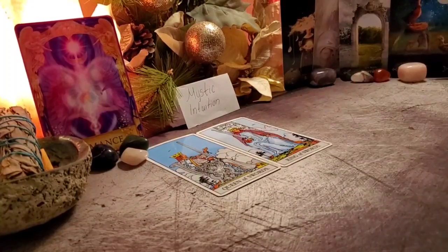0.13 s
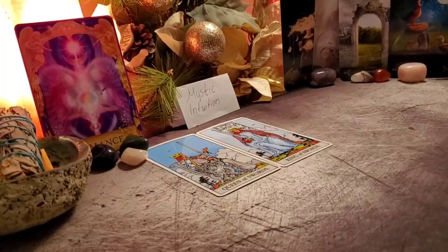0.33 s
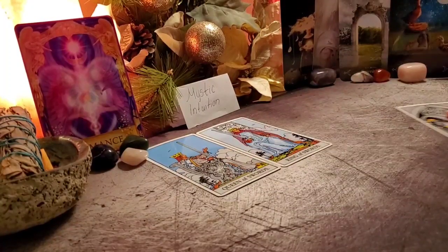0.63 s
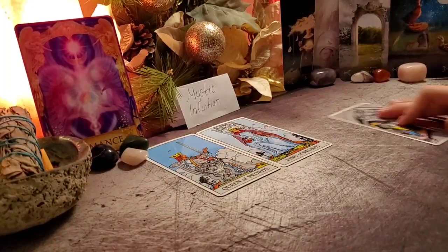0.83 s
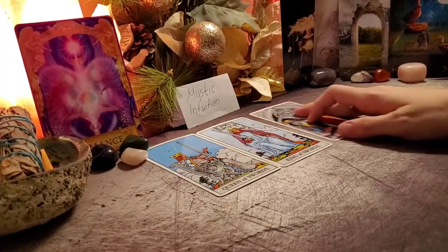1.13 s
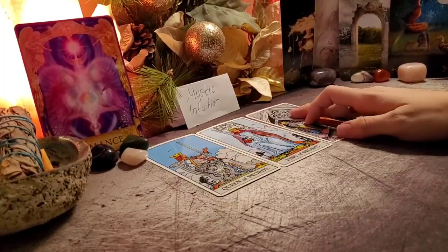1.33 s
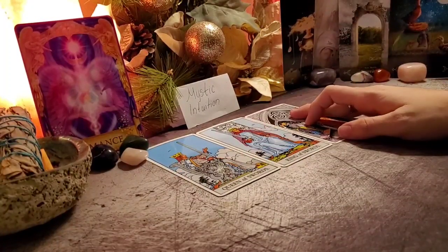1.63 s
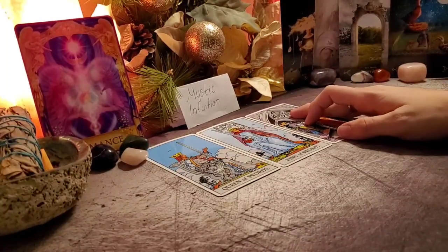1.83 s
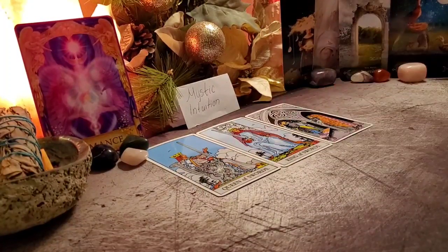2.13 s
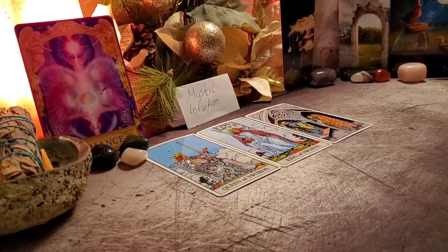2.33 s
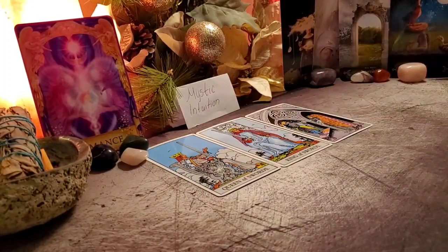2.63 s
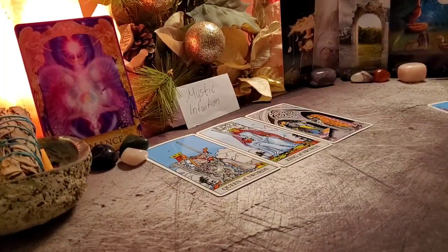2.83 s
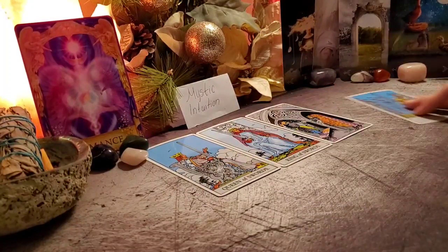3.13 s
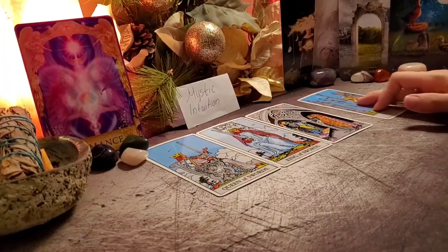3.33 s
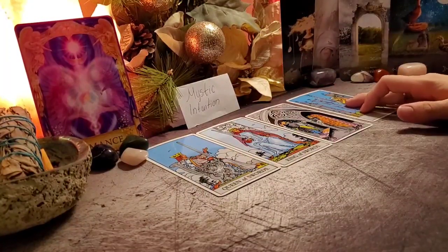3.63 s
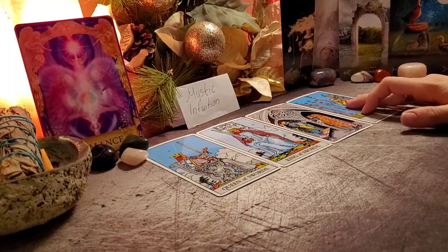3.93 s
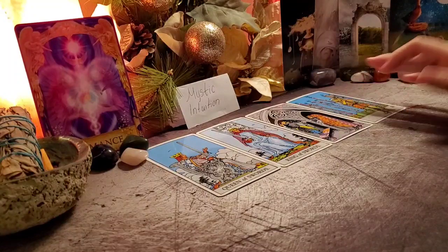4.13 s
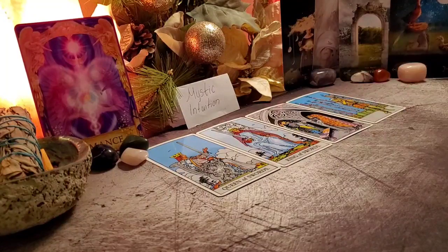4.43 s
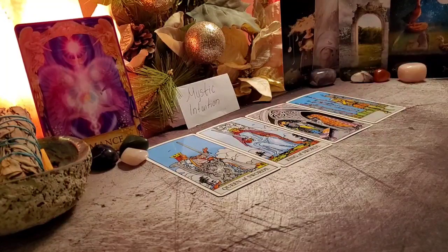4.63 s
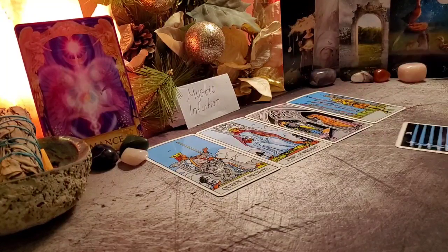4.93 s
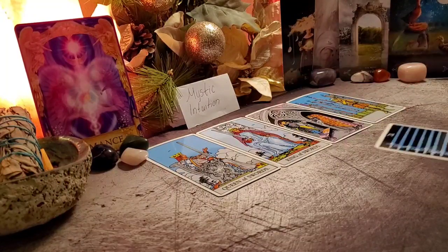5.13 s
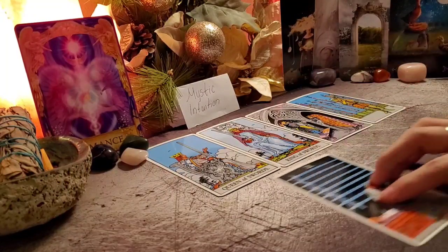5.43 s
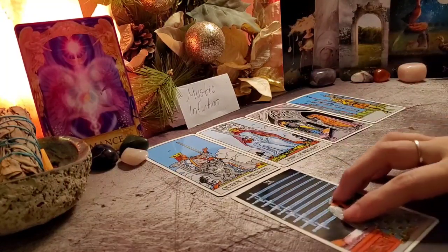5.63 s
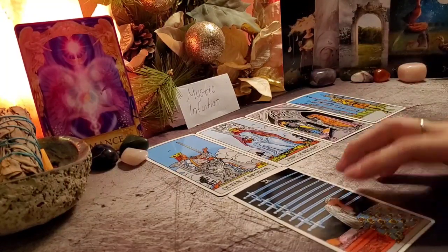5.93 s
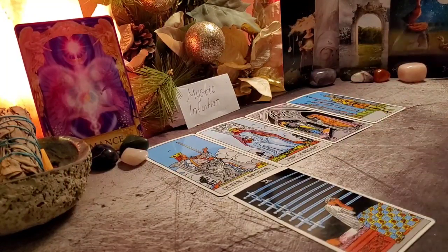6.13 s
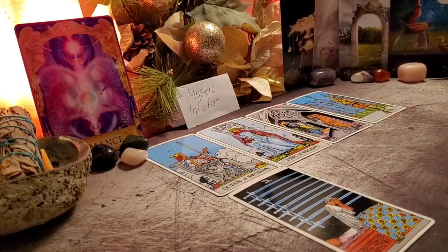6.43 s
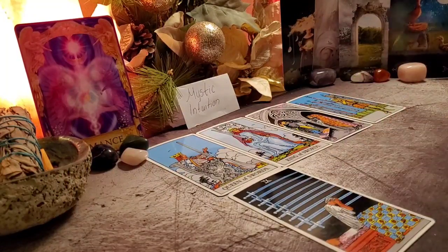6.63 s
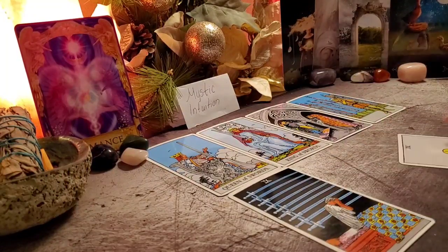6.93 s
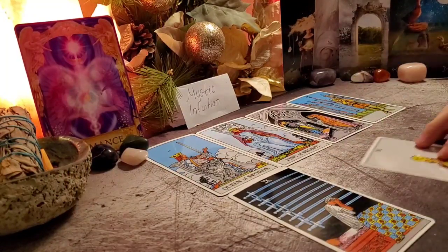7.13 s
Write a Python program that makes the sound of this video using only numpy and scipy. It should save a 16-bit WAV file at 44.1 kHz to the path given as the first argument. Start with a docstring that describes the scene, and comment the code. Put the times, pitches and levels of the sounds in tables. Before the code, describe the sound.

Over a constant low appliance hum in a small room, a card rasps and snaps loudly off a deck on the right, taps the table and brushes quietly into place. This happens four times, about two seconds apart, the last snap duller and followed by a firm knock on the table. Close stereo pickup, short reflections, slight hiss.

```python
"""Stiff cards drawn off a deck

Cards leave a deck held at the right: bright noise scrapes, then ringing cracks with low thuds snap them free.
Struck modes tap each card down on a hard table at times, and wide gritty noise slides it into place.
Sparse reflections make a small room; an appliance hums as a sine with resonant noise and air.
The whole background dips after the first snap and recovers by about 1.75 s.
A spaced pair of microphone ports hears it all, with delay and shading between left and right."""
import sys
import numpy as np
from scipy import signal
from scipy.fft import rfft, irfft
from scipy.io import wavfile
from scipy.ndimage import uniform_filter1d

SR = 44100
rng = np.random.default_rng(int(sys.argv[2]) if len(sys.argv) > 2 else 0)


def inscribe(sig):
    """Save sig as 16-bit PCM at rate SR to the path in sys.argv[1].

    A 1-D sig is mono; a 2-D sig holds one channel per row.
    Samples are clipped to [-1, 1] before scaling.
    """
    pcm = np.round(np.clip(np.atleast_2d(sig).T, -1, 1) * 32767)
    wavfile.write(sys.argv[1], SR, pcm.astype(np.int16))


def volts_from_decibels(level):
    """Turn decibel levels (scalar or array-like) into linear amplitude factors."""
    exponent = np.asarray(level, float) / 20
    return 10 ** exponent


N = 321489

# modes of deck and hand: (f/Hz, level/dB, t60/s)
DECK_MODES = [(219, -10, .04), (276, -7.5, 0.067), (378, -10.5, 0.033), (636, -13.5, 0.013),
              (865, -2.5, 0.041), (1006, -1.5, 0.03), (1270, 0.5, 0.046), (1331, 0.5, 0.02),
              (1410, 0.5, 0.024), (1750, -0.5, 0.018), (2028, 2.5, .03)]
# left port turned away from the deck: (f/Hz, left minus right/dB)
DECK_SHADE = [(60, -10.5), (180, -2), (550, -3), (1650, -5), (4970, -2.5), (15000, -7)]
TABLE_SHADE = [(300, 1.5), (8000, 3.4)]  # (f/Hz, left minus right/dB)
DECK_LAG, TABLE_LAG = 16, 9  # samples by which left lags right


def evened(x):
    """Scales to rms 1."""
    return x / np.sqrt(np.mean(x ** 2) + 1e-20)


def peaked(x):
    """Scales to peak 1."""
    return x / (abs(x).max() + 1e-12)


def read(points, hz):
    """Reads a spectrum on a log-frequency axis."""
    f, value = np.transpose(points)
    return np.interp(np.log(hz + 1), np.log(f + 1), value)


def add(mix, s, sound):
    """Mixes a sound in at s seconds."""
    part = mix[:, round(s * SR):][:, :sound.shape[-1]]
    part += sound[..., :part.shape[1]]


def coloured(x, points):
    """Shapes x by a dB spectrum, rms 1."""
    size = x.shape[-1]
    gain = volts_from_decibels(read(points, np.fft.rfftfreq(size, 1 / SR)))
    return evened(irfft(rfft(x) * gain, size))


def band(x, low_hz, high_hz):
    """Causal band-pass."""
    return signal.sosfilt(signal.butter(2, [low_hz, high_hz], "bandpass", fs=SR, output="sos"), x)


def alike(size, share):
    """Two noises with a common part: a broad source sounds different at each port, except in the bass."""
    common, left, right = rng.standard_normal((3, size))
    share = np.clip(share, 0, 1)
    apart = np.array([left, right]) - common
    return common + (1 - share) * (apart - band(apart, 53, 1400))


def struck(modes, t, centre_hz):
    """Dying sines; a blow favours the modes near its centre, and no two blows land quite alike."""
    hz, db, t60 = np.transpose(modes)[:, :, None]
    spot = rng.standard_normal((len(modes), 2))
    detune = 1 + 0.033 * spot[:, :1]
    luck_db = 3 * spot[:, 1:]
    near_db = -4.0 * np.log2(hz / centre_hz) ** 2
    fall_db = -60 * t / t60
    ring = np.sin(2 * np.pi * hz * detune * t) * volts_from_decibels(db + near_db + luck_db + fall_db)
    return peaked(ring.sum(0))


def grit(per_s, spread_db, smooth_share):
    """Friction: random specks of uneven size over smooth noise, two separate streams."""
    size_db = spread_db * np.minimum(rng.exponential(1, (2, N)), 4)
    specks = (rng.random((2, N)) < per_s / SR) * volts_from_decibels(size_db)
    return evened(specks * rng.standard_normal((2, N))) + smooth_share * rng.standard_normal((2, N))


def strokes(rows, ends_db, square):
    """Each stroke swells to its strongest moment and fades; returns the gains of its two layers."""
    t, power = np.arange(N) / SR, np.zeros((2, N))
    for top, swell, fade, db, second_db in rows:
        away = np.where(t < top, (top - t) / swell, (t - top) / fade)
        # down by ends_db one swell or fade time away; a higher power flattens the top
        shape_db = ends_db * np.minimum(away, 2) ** square
        power += volts_from_decibels(db + np.array([[0], [second_db]]) + shape_db) ** 2
    return np.sqrt(power)


def ports(x, lag, balance):
    """A source nearer the right port reaches the left one later; balance tilts the pair by frequency."""
    tilt_db = read(balance, np.fft.rfftfreq(N, 1 / SR)) * np.array([[.5], [-.5]])
    return irfft(rfft([np.roll(x[0], lag), x[1]]) * volts_from_decibels(tilt_db), N)


def appliance():
    """A mains hum line, resonant drone and room air, all following one background level over time."""
    # background level over time, as that of the hum: (t/s, level/dB)
    background = [(0, -42), (.3, -42.5), (.6, -45.5), (1.0, -44.5), (1.5, -45.5), (1.75, -42.5), (2.1, -42),
                  (4.1, -42.5), (4.3, -42.5), (4.5, -43), (5.5, -43.5), (6.4, -42.5), (7.29, -42.5)]
    # spectrum of the room air, relative: (f/Hz, level/dB)
    air_curve = [(15, -56), (25, -19), (64, -28), (91, -12.5), (126, -17), (148, -14), (169, -15),
                 (421, -18.5), (523, -29), (598, -19), (741, -25), (2170, -32), (4400, -51.5), (7910, -77),
                 (13500, -60.5), (15500, -89.5)]
    # noise resonances of the drone: (f/Hz, width/Hz, level/dB)
    drone_bands = [(56, 20, -55), (120, 9.7, -65.5), (205.5, 12, -58.5), (290, 42, -60), (357, 38, -60.5),
                   (427.3, 110, -56), (603.3, 100, -56), (1355, 330, -68)]
    # left-right likeness of the noise: (f/Hz, correlation from -1 to 1)
    likeness = [(60, 0.51), (130, 1), (290, 0.89), (640, 0.25), (1410, -0.39), (3100, -0.049), (6820, 0.36),
                (15000, 0.027)]
    hum_hz, air_db = 120, -54.5
    s, hum_db = np.transpose(background)
    t, hz = np.arange(N) / SR, np.fft.rfftfreq(N, 1 / SR)

    a, b = rfft(rng.standard_normal((2, N)))
    same = np.clip(read(likeness, hz), -1, 1)
    pair = np.array([a, same * a + np.sqrt(1 - same ** 2) * b])
    air = volts_from_decibels(read(air_curve, hz))
    air *= volts_from_decibels(air_db) / np.sqrt(np.mean(air ** 2))
    drone = np.zeros(len(hz))  # power over frequency
    for f, width, db in drone_bands:
        resonance = 1 / (1 + (2 * (hz - f) / width) ** 2) ** 2
        drone += volts_from_decibels(db) ** 2 * SR / (np.pi * width) * resonance
    noise = irfft(pair * np.sqrt(air ** 2 + drone), N)

    level_db = np.interp(t, s, hum_db)
    phase = 2 * np.pi * hum_hz * t + np.array([[0], [.25]])  # right port leads by 0.25 rad
    hum = np.sqrt(2) * volts_from_decibels(level_db) * np.sin(phase) * volts_from_decibels([[1.1], [-1.1]])
    return hum + noise * volts_from_decibels(level_db - level_db.mean())


def room(x, start_s):
    """Sparse reflections of random sign, each band dying at its own speed, others for each port."""
    # decay off the near walls: (f/Hz, t60/s)
    decay = [(150, 0.3), (500, 0.16), (1500, 0.15), (3500, 0.13), (6000, 0.15), (9000, 0.13),
             (15000, 0.071)]
    late_db, late_stretch = -19, 3.2  # a fainter, slower tail from the rest of the room
    reflections, first = np.zeros((2, SR // 2)), round(start_s * SR)
    slots = np.arange(first, SR // 2 - 12, 12)  # one reflection in every 12 samples
    at = slots + rng.integers(0, 12, (2, len(slots)))
    np.put_along_axis(reflections, at, rng.choice([-1., 1.], at.shape), 1)
    hz, t, z = signal.stft(reflections, SR, nperseg=256)
    fall_db = -60 * t / read(decay, hz)[:, None]
    fall = volts_from_decibels(fall_db) + volts_from_decibels(late_db + fall_db / late_stretch)
    tail = signal.istft(z * fall, SR, nperseg=256)[1]
    low = band(tail[0], 60, 470)
    tail[1] += low - band(tail[1], 54, 390)  # long waves reach both ports alike
    return signal.fftconvolve(x, tail / np.linalg.norm(tail[0]), axes=1)[:, :N]


def slides():
    """Card dragged over the rough table: wide hiss with lower grit; the contact is broad, so the ports differ."""
    # strokes of card and hand: (strongest t/s, swell/s, fade/s, hiss level/dB, low grit re hiss/dB)
    slide_rows = [(.6, .04, .11, -70, -4), (.84, .18, 0.42, -63.5, -5), (1.07, .22, 0.24, -63.5, 1.5),
                  (1.48, .05, 0.078, -83, 4), (1.985, .035, .05, -77.5, 6), (2.15, .16, 0.2, -71.5, -8),
                  (2.39, .07, 0.11, -76, -12), (2.9, .03, 0.076, -73, 6), (3.04, .07, .22, -60.5, -16),
                  (3.27, .24, 0.33, -59, 2), (3.84, .06, 0.12, -80.5, 6), (4.26, .13, 0.21, -73.5, 5),
                  (4.45, .1, 0.11, -89, 8), (5.2, .2, 0.31, -66, -3), (5.5, .32, 0.32, -64, -2.5),
                  (6.23, .2, 0.12, -72, -6), (6.88, .03, 0.16, -68.5, 8.5), (7.06, .09, 0.17, -70, 1),
                  (7.27, .18, 0.11, -69, -5)]
    # spectrum of the rubbing hiss: (f/Hz, level/dB)
    rub_curve = [(2060, -35), (3500, -2.5), (6360, -1), (7810, -7.5), (8690, -4.5), (13900, -6),
                 (14900, -10), (15200, -52), (15500, -48)]
    pan_db = 3  # left minus right
    left, right = coloured(grit(per_s=2700, spread_db=-7.0, smooth_share=1.8), rub_curve)
    low = evened(band(grit(per_s=8400, spread_db=7.0, smooth_share=0.96), 900, 2500))
    fine, coarse = strokes(slide_rows, ends_db=-22, square=2.22)
    hiss_left = left + 0.13 * np.roll(right, TABLE_LAG)
    hiss_right = right + 0.043 * np.roll(left, -TABLE_LAG)
    hiss = np.array([hiss_left, hiss_right])
    return volts_from_decibels(np.array([[pan_db], [-pan_db]]) / 2) * (fine * hiss + coarse * low)


def chatters():
    """Something small on the table bounces after a tap: evenly spaced, fading ticks of a short sine."""
    # taps that set off a chatter: (t/s, level/dB)
    chatter_rows = [(0.5543, -27.5), (2.8638, -31), (4.999, -36.5), (6.8476, -38)]
    gap_s, chatter_hz = .0095, 3050
    out, t = np.zeros((2, N)), np.arange(4096) / SR
    since = t % gap_s  # time since the latest bounce
    bounces = peaked(since * np.exp(-since / 0.00085)) * np.exp(-t / 0.0056) * (t > gap_s)
    for s, db in chatter_rows:
        tone = np.sin(2 * np.pi * chatter_hz * since * rng.uniform(0.98, 1.03))
        add(out, s, volts_from_decibels(db) * peaked(bounces * tone))
    return ports(out, TABLE_LAG, TABLE_SHADE)


def taps():
    """Card and fingers touch the table: a quick push, the table's modes, an edge tick and a brief rattle."""
    # touches: (t/s, blow level/dB, edge tick re blow/dB, rattle re blow/dB)
    tap_rows = [(0.5381, -31, -12, -30), (0.5397, -41.5, 5, -2), (0.5551, -29.5, 5, -16.5),
                (1.319, -57.5, -21.5, -24), (1.5015, -52.5, -21.5, -26), (2.128, -56.5, -17, -20),
                (2.8638, -29, -7, -16), (2.989, -50, 3, -13), (4.9848, -48.5, -13, -12),
                (4.9998, -37, 6, -17), (6.8478, -16.5, -24, -30), (6.8494, -22.5, -24, -35),
                (6.8554, -40, -24, -52), (6.8971, -33.5, -30, -29), (6.909, -39.5, -3, -17.5)]
    # modes of the table top: (f/Hz, level/dB, t60/s)
    table_modes = [(199, -7, 0.054), (440, -26, 0.033), (830, 5, 0.025), (1247, 2, 0.017),
                   (1470, 3.5, 0.022), (2100, 5, 0.025)]
    out, t = np.zeros((2, N)), np.arange(4096) / SR
    push = peaked(t * np.exp(-t / 0.00027))
    for s, db, edge_db, rattle_db in tap_rows:
        edge = peaked(band(alike(len(t), share=0.55) * t * np.exp(-t / 0.00052), 2860, 5760))
        rattle = evened(band(alike(len(t), share=0.18), 550, 4300)) * np.exp(-t / 0.019)
        blow = 1.4 * struck(table_modes, t, centre_hz=1090) + 0.46 * push
        add(out, s, volts_from_decibels(db) * (blow + volts_from_decibels(edge_db) * edge + volts_from_decibels(rattle_db) * rattle))
    return ports(out, TABLE_LAG, TABLE_SHADE)


def draws():
    """Card face scraping over the next card: bright hiss and a buzz of its edge near 3 kHz."""
    # strokes over the deck: (strongest t/s, swell/s, fade/s, hiss level/dB, edge buzz re hiss/dB)
    draw_rows = [(.042, 0.041, 0.03, -62, 4.5), (.13, 0.058, 0.023, -68.5, 0),
                 (.18, 0.032, 0.026, -62, -5.5), (.275, 0.082, .04, -62, 1.5),
                 (.314, 0.021, .02, -42.5, 4.5), (2.56, 0.075, 0.046, -56, -3.5),
                 (2.615, .06, 0.027, -53.5, 2.5), (4.62, 0.13, 0.13, -69, 8.5),
                 (4.725, 0.037, 0.022, -55.5, 1.5), (6.42, .06, 0.042, -70.5, 3),
                 (6.58, 0.11, 0.078, -45, -7)]
    # spectrum of the scraping hiss: (f/Hz, level/dB)
    scrape_curve = [(1760, -34.5), (3000, -8.5), (4170, -5.5), (4470, -35), (4750, -20.5), (5270, -1),
                    (14000, 6.5), (15000, -4.5), (15500, -79.5)]
    hiss = grit(per_s=2900, spread_db=0.5, smooth_share=1.5)
    buzz = grit(per_s=2500, spread_db=2.5, smooth_share=1.2)
    # each port also hears some of the other's stream
    hiss = coloured(hiss + 0.24 * hiss[::-1], scrape_curve)
    buzz = evened(band(buzz + 0.23 * buzz[::-1], 2600, 4000))
    face, edge = strokes(draw_rows, ends_db=-25.5, square=2.6)
    return ports(face * hiss + edge * buzz, DECK_LAG, [(3000, -5.5), (9000, -12.5)])


def thumps():
    """The deck jolts in the hand: a low blow on its modes, with a soft onset."""
    # jolts: (t/s, level/dB)
    thump_rows = [(.328, -20), (2.637, -28.5), (4.737, -13), (4.785, -20), (6.617, -22), (6.677, -28)]
    out, t = np.zeros((2, N)), np.arange(4096) / SR
    for s, db in thump_rows:
        add(out, s, volts_from_decibels(db) * struck(DECK_MODES, t, centre_hz=247) * (1 - np.exp(-t / 0.001)))
    return ports(out, DECK_LAG, DECK_SHADE)


def cracks():
    """A bent card snaps free: a short ring, a spit of treble, a thud of the deck, then grainy flutter."""
    # cracks: (t/s, ring level/dB, ring f/Hz, treble crack re ring/dB, thud re ring/dB)
    crack_rows = [(0.0331, -41.5, 2460, -7.5, -6), (0.04, -36.5, 3100, -4, 0.5),
                  (0.1314, -38, 3600, -5, -7), (0.1688, -50, 3450, 5.5, 2), (0.182, -43, 3190, 1, -6.5),
                  (0.2251, -37, 3350, -4.5, -14), (0.3135, -21, 2290, -7, -15.5),
                  (0.315, -22, 2340, -1.5, -20.5), (0.3195, -15.5, 3130, -11, -13),
                  (0.3266, -13, 2530, -5.5, 10.5), (0.3282, -15, 2630, 2, -3),
                  (0.3307, -14, 2400, 8.5, 9.5), (0.3344, -10, 2690, -8, -9),
                  (0.346, -26.5, 2830, -11.5, -5), (0.351, -16.5, 2950, -3, -1.5),
                  (0.3596, -13.5, 3000, -5.5, -11.5), (0.3681, -21, 2860, 8, -5.5),
                  (0.372, -22.5, 3300, 3.5, -6.5), (2.633, -4.5, 3680, -7.5, -18),
                  (2.6457, -15, 4280, 1.5, 3.5), (2.6562, -33.5, 3430, -8, 3),
                  (2.6757, -41.5, 2810, -3, 2.5), (4.222, -61.5, 2580, 8.5, -1.5),
                  (4.7348, -14, 3070, 0.5, 10), (4.7376, -13, 2680, -19.5, 12), (4.739, -8, 2240, -10.5, 3),
                  (4.7484, -10, 2430, -0.5, -25), (4.753, -11, 3200, 0.5, -55),
                  (4.757, -10.5, 2960, 0.5, -22), (4.761, -19, 2700, -2, -8), (4.767, -20.5, 4100, -2, -8),
                  (4.7738, -20.5, 2470, 1, -11), (4.781, -25.5, 2300, 0, -3.5), (4.7866, -33, 2920, 5, 8.5),
                  (4.7944, -38, 2850, -7, 9), (6.37, -44.5, 2480, -16, 14), (6.4219, -44, 2870, 4, -6),
                  (6.5969, -28, 3200, -3, -17), (6.612, -15.5, 3170, -4.5, 9),
                  (6.6184, -12, 2360, -18.5, 12), (6.623, -12.5, 2500, -16.5, 0),
                  (6.6257, -17, 2860, -15.5, -6), (6.6276, -17.5, 2260, -21, 3),
                  (6.636, -20, 1900, -15, -5), (6.6588, -22, 2620, -3, 12), (6.6608, -37, 1910, -9, -8),
                  (6.6674, -27, 2800, -22, 20), (6.677, -39, 2330, -21.5, 20.5)]
    # spectrum of the flutter: (f/Hz, level/dB)
    flutter_curve = [(88, -29.5), (150, 0.5), (296, 3.5), (509, -3.5), (1370, -0.5), (1800, -13.5),
                     (2180, -2), (2920, -10), (4840, -12), (8170, -19), (13800, -14), (14600, -19.5),
                     (15500, -46)]
    flutter_db = -13.5  # relative to the ring
    out, t = np.zeros((2, N)), np.arange(4096) / SR
    swell = peaked(t ** 2 * np.exp(-t / 0.00029))
    for s, db, hz, crack_db, thud_db in crack_rows:
        rough = evened(band(rng.standard_normal(len(t)), 1300, 4100))
        bend = np.sin(2 * np.pi * (hz * t + rng.random())) + .5 * rough
        ring = peaked(swell * bend)
        crack = peaked(band(alike(len(t), share=0.2) * swell, 2600, 15500))
        slaps = volts_from_decibels(2.5 * evened(uniform_filter1d(rng.standard_normal(len(t)), size=50)))  # uneven, about 1 ms
        flutter = coloured(alike(len(t), share=0.069) * slaps, flutter_curve)
        flutter = flutter * (1 - np.exp(-t / 0.00067)) * np.exp(-t / 0.012)
        thud_hz = 1150 * 2 ** (db / 28)  # a harder crack thuds higher: an octave per 28 dB
        thud = struck(DECK_MODES, t, thud_hz) * rng.choice([-1, 1]) * (1 - np.exp(-t / 0.00066))
        snap = ring + volts_from_decibels(crack_db) * crack + volts_from_decibels(thud_db) * thud + volts_from_decibels(flutter_db) * flutter
        add(out, s, volts_from_decibels(db) * snap)
    return ports(out, DECK_LAG, DECK_SHADE)


def scene():
    """Hands and cards in the room, over the appliance."""
    cards = chatters() + taps() + draws() + thumps() + cracks()
    return appliance() + volts_from_decibels(-12.5) * room(cards, start_s=.004) + slides() + cards


def roll_off(x):
    """The treble ends steeply here."""
    return signal.sosfilt(signal.butter(12, 16510, fs=SR, output="sos"), x)


def record(dry):
    """Adds microphone hiss, then cuts the lows below 38 Hz and the top above 14.7 kHz."""
    hiss = volts_from_decibels(-83.5) * rng.standard_normal(dry.shape)
    mix = signal.sosfilt(signal.butter(2, 38, "highpass", fs=SR, output="sos"), dry + hiss)
    mix = signal.sosfilt(signal.cheby2(16, 22, 14700, fs=SR, output="sos"), mix)
    return roll_off(mix)


dry = scene()
out = record(dry)
inscribe(out)
```